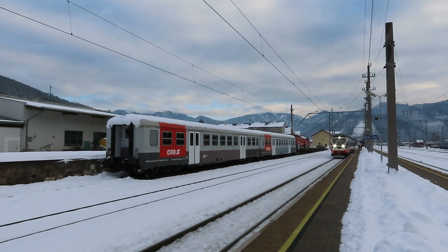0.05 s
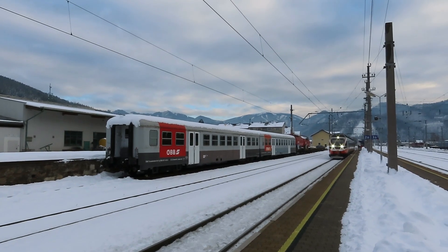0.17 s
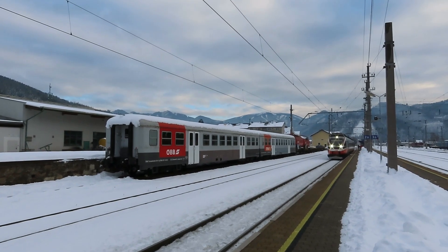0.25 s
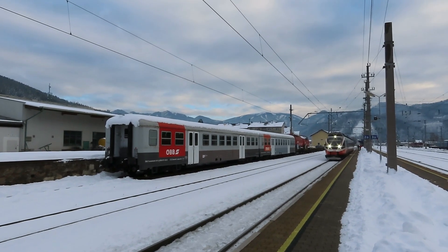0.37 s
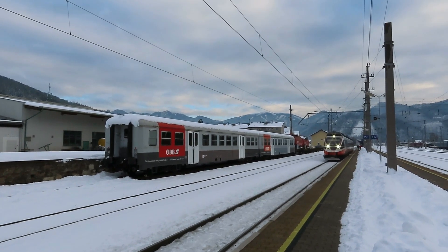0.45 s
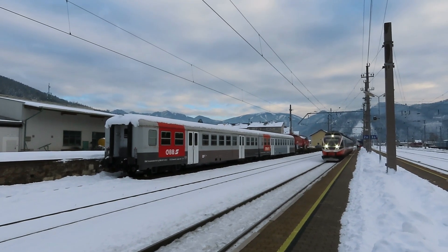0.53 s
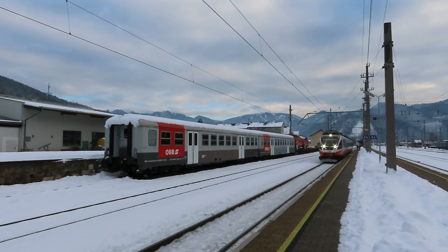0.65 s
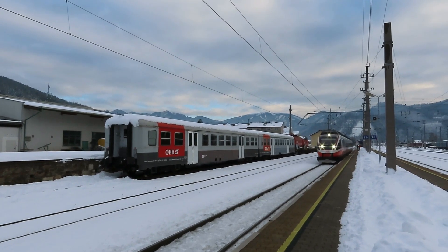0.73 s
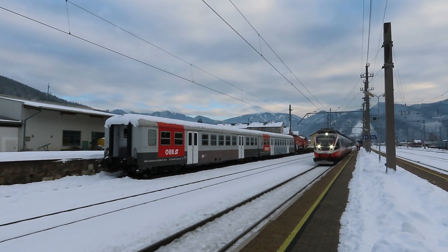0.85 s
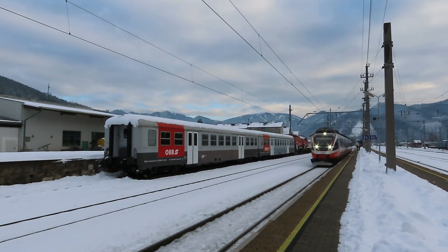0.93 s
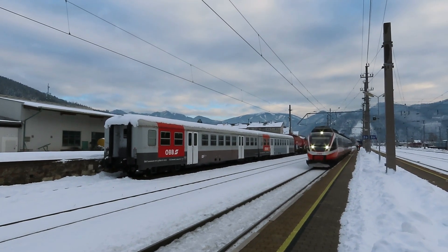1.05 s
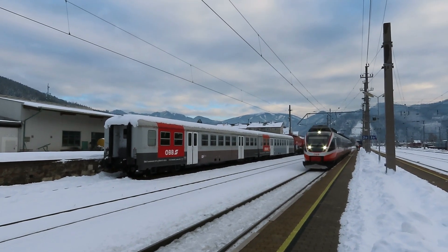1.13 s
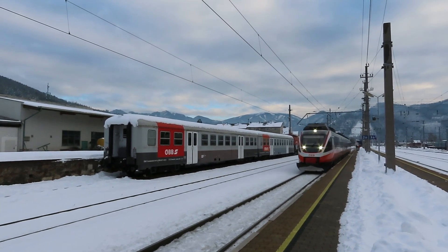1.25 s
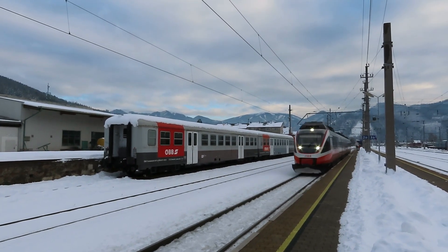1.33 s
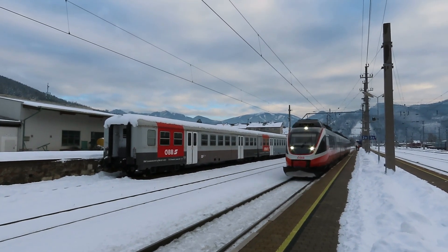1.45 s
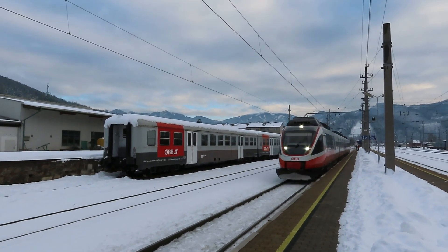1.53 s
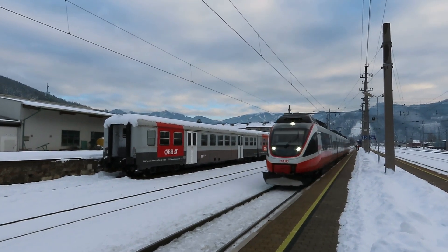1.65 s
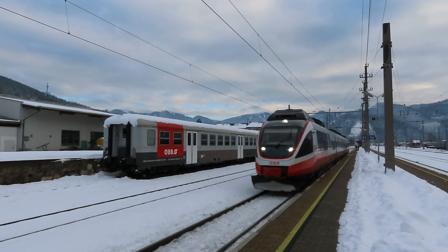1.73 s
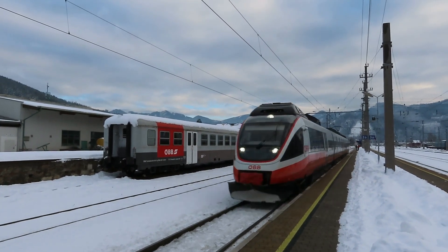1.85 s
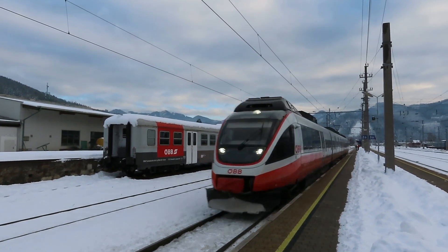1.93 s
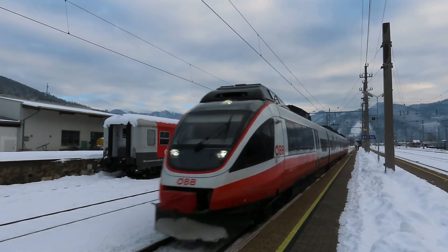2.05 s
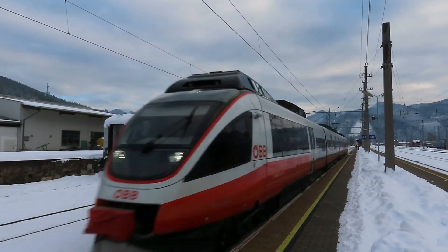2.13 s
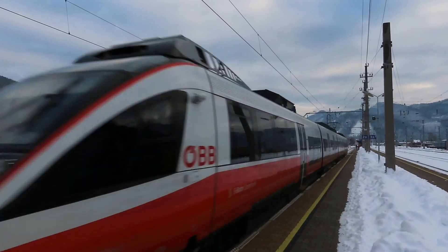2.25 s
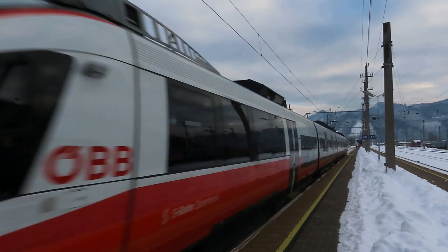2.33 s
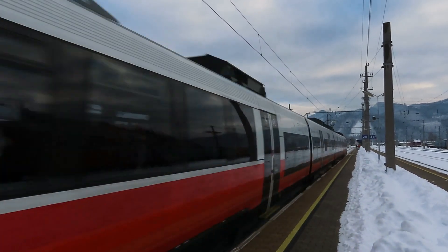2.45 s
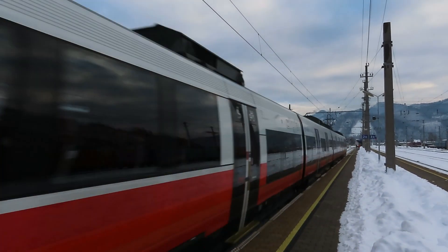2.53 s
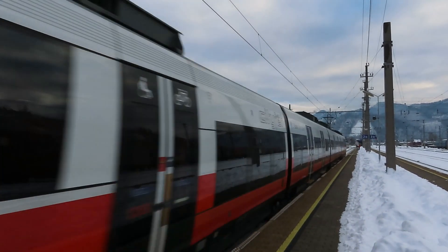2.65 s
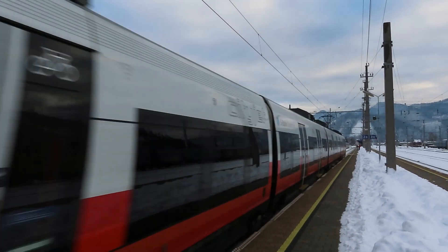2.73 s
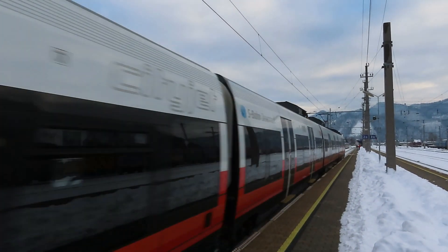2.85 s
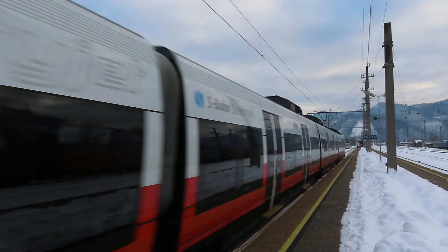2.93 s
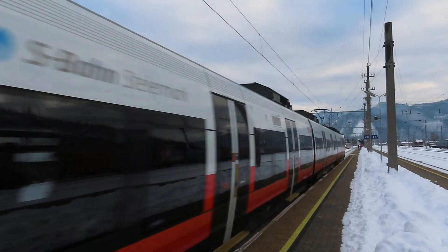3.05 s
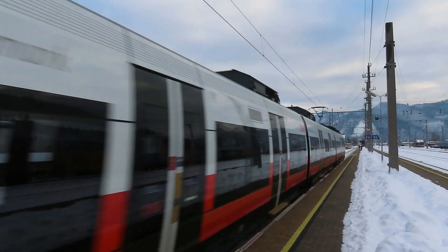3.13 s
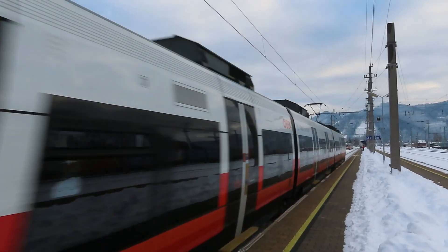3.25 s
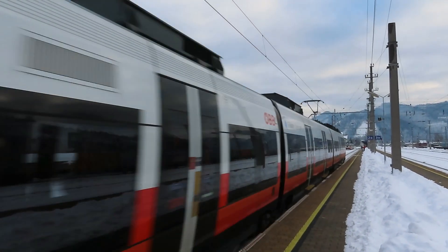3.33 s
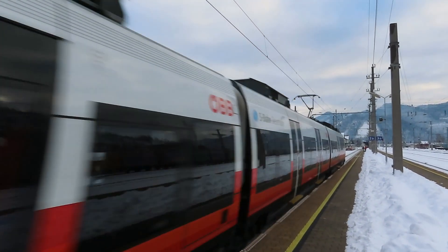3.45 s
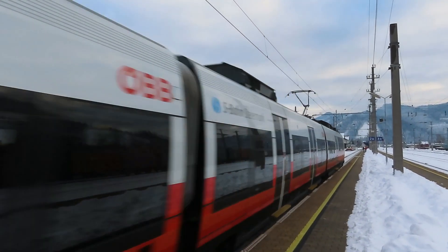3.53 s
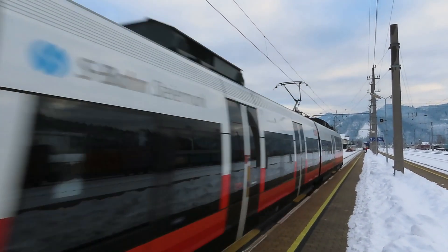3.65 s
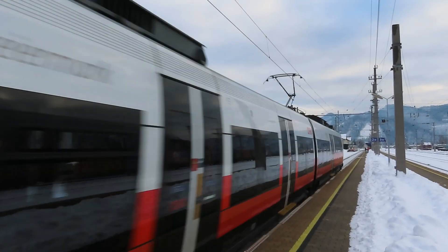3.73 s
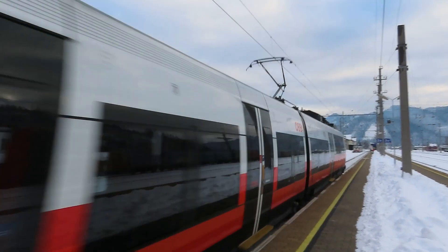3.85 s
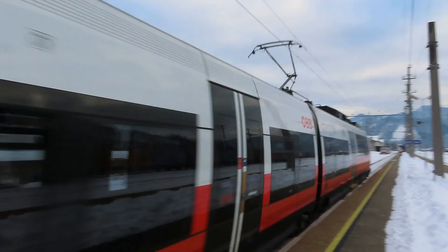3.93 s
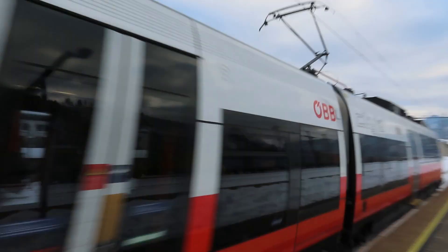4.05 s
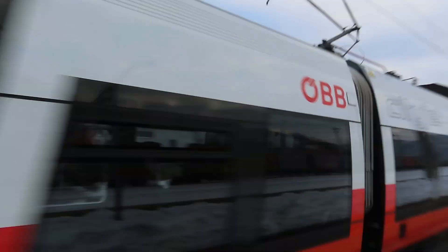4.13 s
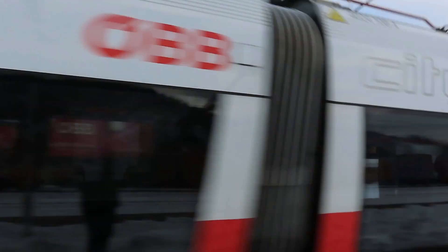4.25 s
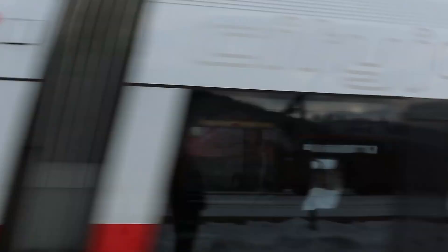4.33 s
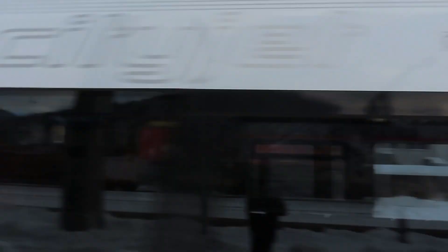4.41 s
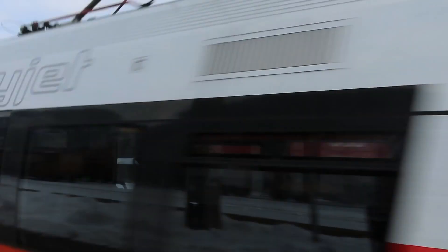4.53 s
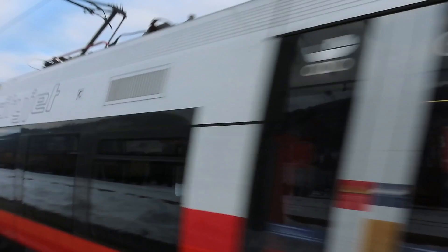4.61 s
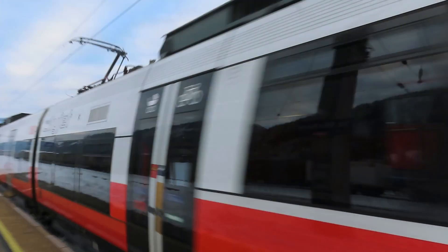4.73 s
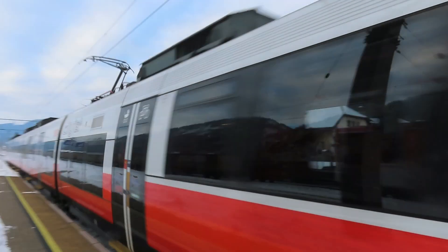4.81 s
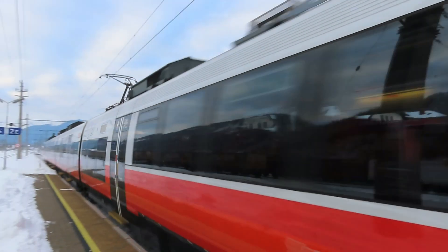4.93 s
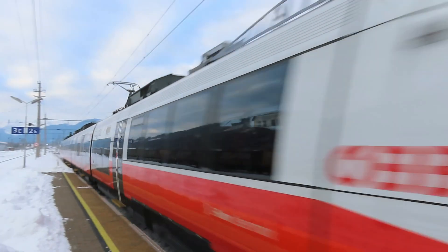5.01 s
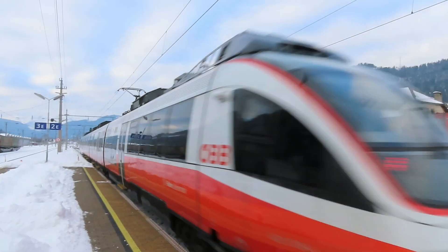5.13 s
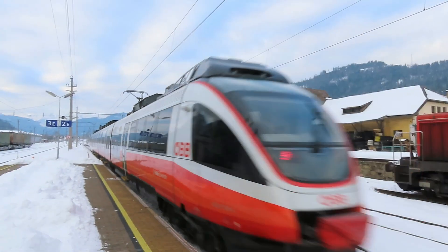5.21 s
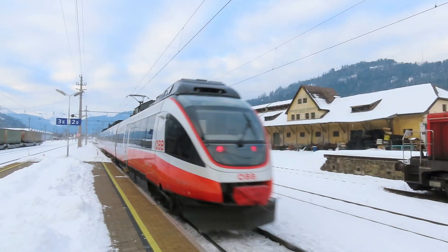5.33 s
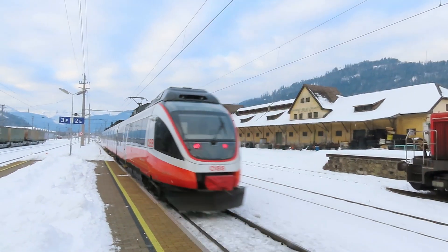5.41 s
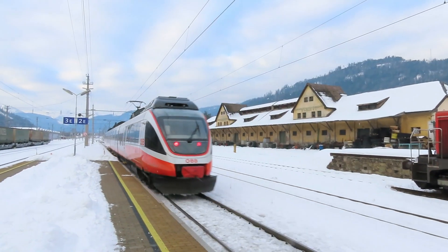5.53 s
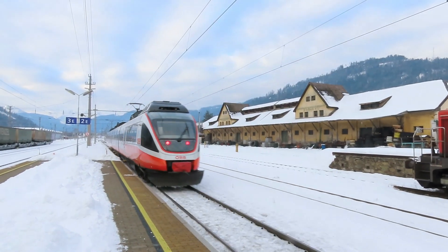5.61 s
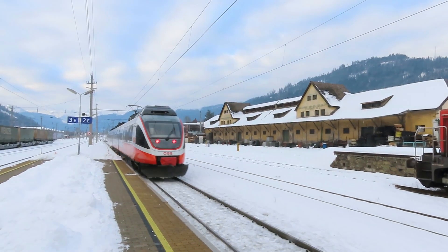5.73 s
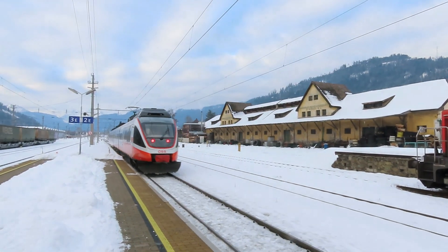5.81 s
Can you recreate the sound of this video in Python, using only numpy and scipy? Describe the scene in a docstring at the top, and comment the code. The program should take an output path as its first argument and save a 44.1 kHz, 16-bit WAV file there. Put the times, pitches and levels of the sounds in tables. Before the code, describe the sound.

On an open, snowy station platform, distant rail roar and ringing wheels swell with hissing snow and deep air rumble. The nose passes at about two and a half seconds with a buffeting gust and brief squeals. Carriages then boom low while wheel sets knock past in clusters, until the tail leaves and fans and a thin motor whine trail away. Close stereo microphone, nearly centred.

```python
"""Distant rail roar and ringing wheels come first, heard by two close microphone ports on a snowy platform.
An electric train nears at 24 m/s: filtered noise makes roar, snow hiss and air, tuned resonances the ringing.
The nose pushes a gust over the ports; then the platform edge hides the rails while bogies rumble and knock by.
Bogies are swells of coloured noise, knocks are sums of dying modes; a thin rising motor whine trails away."""
import sys
import numpy as np
from scipy import signal
from scipy.fft import rfft, irfft, next_fast_len
from scipy.io import wavfile
from scipy.ndimage import uniform_filter1d, minimum_filter1d, map_coordinates

SR = 44100
rng = np.random.default_rng(int(sys.argv[2]) if len(sys.argv) > 2 else 0)


def store_pcm(level_fs):
    """Save levels as 16-bit WAV."""
    pcm = np.round(np.clip(level_fs, -1, 1) * 32767).astype(np.int16)
    wavfile.write(sys.argv[1], SR, np.atleast_2d(pcm).T)


N = 258867
TIME = np.arange(N) / SR
# speed of the train, and the moments when its front wheels and its tail go by
SPEED_M_S, FRONT_S, TAIL_S = 24, 2.578, 5.005


def undb(db):
    """Decibels to gain."""
    return 10 ** (np.asarray(db) / 20)


def unit(x):
    """Scale to rms 1."""
    return x / np.sqrt(np.mean(x ** 2))


def curve(rows):
    """Each column of a table after its times, interpolated at every sample."""
    s, *columns = np.transpose(rows)
    return [np.interp(TIME, s, column) for column in columns]


def during(rows, fade_s=0.064):
    """1 within the time span of a table, fading out on both sides."""
    first_s, last_s = rows[0][0], rows[-1][0]
    return np.interp(TIME, [first_s - fade_s, first_s, last_s, last_s + fade_s], [0, 1, 1, 0])


def shape(x, points):
    """Filter by a spectrum of (Hz, dB) points, joined along log frequency."""
    hz, db = np.transpose(points)
    size = next_fast_len(N)
    bins = np.maximum(np.fft.rfftfreq(size, 1 / SR), 1)
    gain = undb(np.interp(np.log(bins), np.log(hz), db))
    return irfft(rfft(x, size) * gain, size)[..., :N]


def walk(rate):
    """Random levels held 1 / rate s and slewed twice; spread 1."""
    k = max(int(SR / rate), 1)
    held = rng.standard_normal(N)[np.arange(N) // k]
    return unit(uniform_filter1d(uniform_filter1d(held, k), k))


def delay(x, samples):
    """Read a sound late by a fixed or moving number of samples."""
    return map_coordinates(x, [np.arange(N) - samples], order=5, mode="mirror")


def resonance(hz, width_hz):
    """A randomly driven resonance: its strength and phase wander as fast as it is wide."""
    drive = walk(width_hz) + 1j * walk(width_hz)
    return np.real(drive * np.exp(2j * np.pi * np.cumsum(hz * np.ones(N)) / SR))


def spread(at_s, reach_m):
    """Gain 1 / distance of a part of the train that passes reach_m away; 1 as it passes."""
    return reach_m / np.hypot(reach_m, SPEED_M_S * (TIME - at_s))


def fade(seconds, db_per_s):
    """Gain 1 until the count of seconds turns positive, then a steady fall."""
    return undb(-db_per_s * np.maximum(seconds, 0))


def bell(at_s, half_s):
    """A smooth swell that reaches 1 at one moment."""
    return np.exp(-.5 * ((TIME - at_s) / half_s) ** 2)


def together(gains):
    """Unrelated sources add in power."""
    return np.sqrt(sum(gain ** 2 for gain in gains))


# scattered sound that differs between the two ports: [f/Hz, side minus mid level/dB before scatter_db]
SCATTER = [(40, -51), (150, -30.5), (400, -22), (700, -24.5), (1300, -17), (3000, -15), (6000, -9.5),
           (10000, -7.5), (15000, -10)]


def noise(colour, scatter_db=0):
    """Coloured noise at both ports, with a scattered part that differs between them."""
    mid, side = shape(rng.standard_normal((2, N)), colour)
    side = shape(unit(side), SCATTER) * undb(scatter_db)
    return unit(mid) + np.array([side, -side])


def roar_level(front_db=-24.5, front_reach_m=12, hide_db_per_s=50,
               surge_s=1.31, surge_half_s=0.083, surge_db=2, bogie_reach_m=6.76,
               tail_db=-43.0, tail_reach_m=4.2, emerge_db_per_s=45,
               shade_s=2.525, shade_half_s=0.081, shade_db=-4.0):
    """Relative roar: grows and surges, shaded by the nose, hidden by the platform, leaking at bogies and tail."""
    swell_db = surge_db * bell(surge_s, surge_half_s) + shade_db * bell(shade_s, shade_half_s)
    hidden = fade(TIME - FRONT_S, hide_db_per_s)
    front = undb(front_db + swell_db) * spread(FRONT_S, front_reach_m) * hidden
    leaks = [undb(roar_db) * spread(s - lead_s, bogie_reach_m) ** 3
             for s, _, _, _, roar_db, _, _, lead_s in BOGIES]
    tail = undb(tail_db) * spread(TAIL_S, tail_reach_m) * fade(TAIL_S - TIME, emerge_db_per_s)
    return together([front, tail, *leaks])


# share of the roar that the ground mirrors while the train is far and once it is here, and how late it comes
MIRROR_FAR, MIRROR_NEAR, MIRROR_DELAY_S = 0.3, 0.034, 0.00053
# spectrum of the rail roar: [f/Hz, relative level/dB per Hz]
ROAR_COLOUR = [(50, -31), (120, -12), (170, -11.5), (240, -3), (330, -0.5), (520, -2), (760, 0.5),
               (1100, -5), (1400, -6.5), (1800, -6), (2150, -16), (2700, -16), (3200, -24), (4200, -27),
               (6000, -37), (15000, -61.5)]


def rail_roar(gain_db=9, flutter_db=0.83, ground_turn_rad=0.71, closing_s=0.97):
    """Rough wheels shake the rails; a ground bounce combs roar and snow hiss, most while the train is far."""
    share = np.interp(TIME, [FRONT_S - closing_s, FRONT_S], [MIRROR_FAR, MIRROR_NEAR])
    roar = noise(ROAR_COLOUR) * roar_level() * undb(gain_db + flutter_db * walk(29.63))
    direct = roar + snow_hiss()
    # soft ground turns the phase of what it reflects
    analytic = signal.hilbert(direct, next_fast_len(N))[:, :N]
    mirrored = np.real(analytic * np.exp(1j * ground_turn_rad))
    bounce = np.array([delay(port, MIRROR_DELAY_S * SR) for port in mirrored])
    return (direct + share * bounce) / np.sqrt(1 + share ** 2)


# leading wheels: pitch as they pass before Doppler, its slow sag, the moment and distance of passing
RING_HZ, RING_SAG_HZ_PER_S, RING_PASS_S, RING_DISTANCE_M = 756, 19, 2.62, 2.195
# resonances of a wheel: [multiple of its ringing pitch, relative level/dB]
WHEEL_MODES = [(.95, -5.5), (1, 0), (1.035, -1.5), (1.07, -3.5), (2.13, -10.5)]


def wheel_ring(width_hz=28, gain_db=-23.5, reach_m=12, hide_db_per_s=90, start_s=0.39, rise_db_per_s=40):
    """The wheel's resonances, driven at random by the rail, grow as it nears and drop in pitch as it passes."""
    since_s = TIME - RING_PASS_S
    along_m = SPEED_M_S * since_s
    # Doppler shift, with sound at 343 m/s
    doppler = 1 / (1 + SPEED_M_S / 343 * along_m / np.hypot(along_m, RING_DISTANCE_M))
    hz = (RING_HZ - RING_SAG_HZ_PER_S * since_s) * doppler
    ring = sum(undb(mode_db) * resonance(hz * ratio, width_hz) for ratio, mode_db in WHEEL_MODES)
    rise, hidden = fade(start_s - TIME, rise_db_per_s), fade(since_s, hide_db_per_s)
    return unit(ring) * undb(gain_db) * spread(FRONT_S, reach_m) * rise * hidden


# thin sizzle of snow while the train is still far off: [f/Hz, relative level/dB per Hz]
FAR_SNOW_COLOUR = [(7000, -34.5), (10000, -18), (11000, -11), (12700, -2), (13800, -7), (15700, -5.5)]


def far_snow(level_db=-59, rise_db_per_s=5, shared_db=-14):
    """A very high sizzle runs ahead of the train, wide and nearly opposite at the two ports."""
    mid, side = unit(shape(rng.standard_normal((2, N)), FAR_SNOW_COLOUR))
    ports = mid * undb(shared_db) + np.array([side, -side])
    return ports * undb(level_db + rise_db_per_s * TIME) * fade(TIME - FRONT_S, 60)


# puffs of air from bow wave, nose, front wheels, carriage gaps and tail: [t/s, level/dB, half duration/s]
PUFFS = [(0.1, -45, .15), (0.6, -38.5, 0.3), (1.02, -33, 0.11), (1.288, -30.5, 0.1), (1.615, -27, 0.047),
         (1.834, -23.5, 0.067), (2.3, -21, 0.072), (2.563, -23.5, 0.03), (2.852, -36.5, 0.22),
         (5.324, -37.5, 0.12), (5.85, -43, 0.14)]


def air_level(bow_db=-23, bow_reach_m=18, falloff=1.65, stop_db_per_s=200, drag_db=-55):
    """A bow wave builds and stops once the front is past; single puffs ride on it and on a faint drag."""
    bow = undb(bow_db) * spread(FRONT_S, bow_reach_m) ** falloff * fade(TIME - FRONT_S, stop_db_per_s)
    puffs = [undb(db) * bell(s, half_s) for s, db, half_s in PUFFS]
    return together([bow, undb(drag_db), *puffs])


# spectrum of the moving air: [f/Hz, relative level/dB per Hz]
AIR_COLOUR = [(10, -17), (25, 1.5), (38, -3.5), (55, 8.5), (72, 4.5), (90, -2), (120, 1.5), (170, -7.5),
              (400, -52.5), (3000, -84.5)]


def air_rumble():
    """The deep sound of the air that the train pushes ahead and drags along."""
    return noise(AIR_COLOUR) * air_level()


# hiss of snow blown up by the nose: [t/s, level/dB before gain_db]
SNOW = [(0.98, -62.5), (1.14, -50.5), (1.35, -49.5), (1.87, -48.5), (2.31, -38.5), (2.51, -42.5),
        (2.57, -43.5), (2.79, -55), (3.14, -62.5), (3.3, -92.5)]
# its spectrum: [f/Hz, relative level/dB per Hz]
SNOW_COLOUR = [(1000, -19), (2500, 19), (3200, 2), (4200, 9), (5000, 2), (8000, 5), (11000, 2),
               (13800, 0.5), (15700, -9)]


def snow_hiss(gain_db=4.5, flutter_db=1.34):
    """Fine snow sprays ahead of the train until the nose has gone by."""
    db, = curve(SNOW)
    return noise(SNOW_COLOUR, scatter_db=0.5) * undb(db + gain_db + flutter_db * walk(60)) * during(SNOW)


# low booms of the air around the train: [t/s, level/dB, half duration/s, f/Hz]
BOOMS = [(1.493, -27.5, 0.032, 118), (1.7, -30.5, 0.061, 135), (1.94, -24.5, 0.053, 130),
         (2.17, -22.5, 0.072, 150), (3.102, -21, 0.046, 164), (5.048, -36.5, 0.11, 114.9),
         (5.254, -35, 0.053, 111.4)]


def air_booms(width_hz=55):
    """Air booms in short swells on low, wavering notes: ahead of the nose, under a carriage, behind the tail."""
    return sum(resonance(hz, width_hz) * undb(db) * bell(s, half_s) for s, db, half_s, hz in BOOMS)


def rumble_level(side_db=-22.5, start_s=1.73, end_s=4.725, rise_db_per_s=19, fall_db_per_s=55,
                 nose_s=2.29, nose_db=-14, nose_reach_m=2.6,
                 bogie_reach_m=5, lag_s=0.03, tail_db=-28.5, tail_reach_m=9):
    """The relative boom holds beside carriages, swells at nose and bogies, and trails behind the tail."""
    side = undb(side_db) * fade(start_s - TIME, rise_db_per_s) * fade(TIME - end_s, fall_db_per_s)
    nose = undb(nose_db) * spread(nose_s, nose_reach_m) ** 2
    tail = undb(tail_db) * spread(TAIL_S, tail_reach_m)
    swells = [undb(boom_db) * spread(s + lag_s, bogie_reach_m) ** 2
              for s, _, _, _, _, boom_db, _, _ in BOGIES]
    return together([side, nose, tail, *swells])


# spectrum of the carriage boom: [f/Hz, relative level/dB per Hz]
RUMBLE_COLOUR = [(20, -58.5), (45, -37.5), (80, -12), (130, -2), (175, -2), (220, 1.5), (340, 3),
                 (480, -1.5), (600, -5.5), (750, -11.5), (1000, -14), (1500, -26), (3000, -45),
                 (8000, -60.5), (15000, -81)]


def body_rumble(gain_db=-1.0, throb_db=1.14):
    """The carriages boom in the gap between train and platform."""
    level = rumble_level() * undb(gain_db + throb_db * walk(21.76))
    return noise(RUMBLE_COLOUR, scatter_db=-28.0) * level


# brief groans, squeals and squeaks of wheels rubbing the rail: [t/s, level/dB, half duration/s, f/Hz]
SQUEALS = [(2.06, -28.5, 0.04, 841), (2.265, -18, 0.019, 786), (2.286, -20, 0.036, 840),
           (2.416, -16, 0.0095, 856), (2.566, -20, 0.011, 760), (2.615, -17.5, 0.0085, 772),
           (3.136, -15, 0.026, 535), (3.191, -11.5, 0.017, 570), (3.22, -14.5, .012, 491),
           (3.783, -14, 0.018, 415), (3.85, -22.5, 0.027, 505), (3.907, -27, 0.0069, 826),
           (4.419, -20.5, .025, 364.7), (4.55, -24, 0.025, 357), (3.946, -57, 0.009, 3340),
           (4.19, -63, .02, 4300), (4.37, -58, .012, 3330), (4.92, -57, .06, 2530),
           (5.364, -36, 0.075, 312), (5.62, -59, .03, 2280)]


def wheel_squeals(waver=0.0029, rough_db=3.5):
    """A rubbing wheel sings or groans for an instant on one rough, unsteady note."""
    wavering_s = np.cumsum(1 + waver * walk(90)) / SR
    notes = sum(undb(db) * bell(s, half_s) * np.sin(2 * np.pi * hz * wavering_s)
                for s, db, half_s, hz in SQUEALS)
    return np.sqrt(2) * notes * undb(rough_db * walk(120))


# spectrum of the gust at the microphone: [f/Hz, relative level/dB per Hz]
GUST_COLOUR = [(20, -20), (60, -5.5), (130, 8.5), (220, 2.5), (420, -10.5), (1000, -41.5), (4000, -42),
               (15000, -86.5)]


def nose_gust(at_s=2.406, reach_m=2.55, gust_db=-14.0, buffet_db=4.0):
    """The pressure wave of the nose buffets each port with its own noise."""
    eddies = unit(shape(rng.standard_normal((2, N)), GUST_COLOUR))
    closeness = spread(at_s, reach_m) ** 4
    return eddies * undb(gust_db + buffet_db * walk(25.66)) * closeness


# leading wheels come level with the microphone, each with a bright rush: [t/s, level/dB, half duration/s]
WHEEL_RUSHES = [(2.501, -15.5, 0.011), (2.54, -18, 0.012), (2.608, -21, 0.014)]
# spectrum of that rush: [f/Hz, relative level/dB per Hz]
RUSH_COLOUR = [(150, -20), (480, 7), (800, 6), (1300, 6), (1900, -4), (2600, -20), (3400, -11), (5000, -24),
               (9000, -28), (15000, -45)]


def wheel_rushes():
    """The leading wheels flash by in the open before the platform edge hides them."""
    return noise(RUSH_COLOUR) * together([undb(db) * bell(s, half_s) for s, db, half_s in WHEEL_RUSHES])


# snow thrown against the platform by plough and front wheels: [t/s, level/dB, reach/m]
SPRAYS = [(2.535, -31, 2.7), (2.73, -42.5, .7), (2.814, -50, .8)]
# its spectrum: [f/Hz, relative level/dB per Hz]
SPRAY_COLOUR = [(1500, -23.5), (3500, 0), (6000, -0.5), (9000, 0.5), (12500, 6.5), (15000, -2.5),
                (15700, -4.5)]


def plough_spray(scatter_db=-18.0, falloff=2.8):
    """The plough throws a burst of snow against the platform as it goes by, and two small swishes follow."""
    level = together([undb(db) * spread(s, reach_m) ** falloff for s, db, reach_m in SPRAYS])
    return noise(SPRAY_COLOUR, scatter_db) * level


# turns of a wheel per second, and a moment when its rough spot meets the rail
WHEEL_TURNS_HZ, WHEEL_TURN_S = 11.27, 3.77
# bogies going by, also used for roar, boom and bearing: [t/s, level/dB, half duration/s, resonance f/Hz,
# rail roar level/dB and carriage boom level/dB before their layers' gains,
# lead of the left port/samples, lead of the rail roar/s]
BOGIES = [(2.537, -20, 0.15, 431, -39.5, -26.5, 1.98, .066),
          (3.163, -19, 0.13, 480, -35.5, -14, 2.1, 0.075),
          (3.827, -19, 0.11, 415, -43.5, -17.5, 2, -0.0015),
          (4.409, -20.5, 0.17, 402, -44.5, -18.5, 0.86, 0.013),
          (4.998, -35, 0.12, 465, -48, -43.5, -1.8, 0.057)]
# spectrum of a rolling bogie: [multiple of its resonance, relative level/dB per Hz]
BOGIE_COLOUR = [(.1, -60), (.25, -31), (.67, -7), (.87, 0.5), (1.13, 4.5), (1.4, -4), (2, -14.5), (10, -49),
                (30, -75)]


def bogie_passes(throb=0.3, shake_db=1.94):
    """Each bogie swells and fades with its own resonance, throbbing once a wheel turn."""
    out = 0
    for s, db, half_s, hz, *_ in BOGIES:
        colour = [(hz * ratio, point_db) for ratio, point_db in BOGIE_COLOUR]
        swell = undb(db) / (1 + ((TIME - s) / half_s) ** 4) ** .5
        out = out + noise(colour, scatter_db=-14.5) * swell
    turns = WHEEL_TURNS_HZ * (TIME - WHEEL_TURN_S)
    return out * (1 + throb * np.cos(2 * np.pi * turns)) * undb(shake_db * walk(90))


# wheels knocking on the rail:
# [t/s, peak level/dB, centre f/Hz of the modes that the blow favours, ring time as a share of the modes' t60]
KNOCKS = [(2.928, -9, 300, 1), (2.961, -10, 290, 1.4), (3.034, -6, 259, 1), (3.057, -1.5, 406, 1),
          (3.094, -7, 331, .4), (3.129, -12, 503, 0.92), (3.150, -7, 528, 0.79), (3.174, -3, 363, 0.84),
          (3.212, -3.5, 492, 1.5), (3.25, -10, 342, .5), (3.296, -8.5, 484, .8), (3.32, -7.5, 223, 0.77),
          (3.738, -12.5, 420, 1), (3.762, -2.5, 365, 1.3), (3.781, -2, 423, 0.74), (3.825, -4, 463, 0.65),
          (3.855, -8, 328, 0.76), (3.936, -5, 300, 0.81), (3.954, -7, 290, 0.99), (4.117, -12, 293, .8),
          (4.196, -3.5, 334, 1), (4.209, -5.5, 343, .9), (4.277, -5.5, 503, 0.68), (4.290, -6, 280, 0.95),
          (4.301, -4, 320, .6), (4.314, -9, 400, 0.52), (4.339, -12, 420, .5), (4.363, -10, 490, 0.78),
          (4.379, -6.5, 240, 0.71), (4.392, -5.5, 360, .9), (4.471, -3.5, 570, 0.54),
          (4.489, -6.5, 358, 0.45), (4.53, -9, 350, 1), (4.553, -7.5, 317, 0.83), (4.68, -12, 310, 1.3),
          (4.777, -13.5, 298, 1.6), (5.228, -18, 328, 0.82), (5.328, -24, 320, 1.2)]
# modes of a bogie: [f/Hz before detuning, relative level/dB, t60/s]
BOGIE_MODES = [(223.7, 0.5, 0.12), (288, 1.5, 0.06), (347, 2.5, 0.036), (427, 0, 0.046), (489, 1.5, 0.042),
               (572, 1, 0.063), (790, 1, 0.033), (1100, -3.5, 0.02), (1550, -3.5, 0.018)]


def wheel_knocks(contact_s=0.00451, detune=0.021, favour_octaves=0.23):
    """Each knock rings slightly detuned bogie modes, favouring those near its own centre frequency."""
    out, t = np.zeros(N + SR), np.arange(SR // 10) / SR
    hz, mode_db, t60 = np.transpose(BOGIE_MODES)[:, :, None]
    chances = rng.standard_normal((len(KNOCKS), len(hz), 1))
    for (s, db, centre_hz, ring), chance in zip(KNOCKS, chances):
        favour = 1 / (1 + (np.log2(hz / centre_hz) / favour_octaves) ** 2)
        decay = np.exp(-np.log(1000) * t / (ring * t60))
        tones = np.sin(2 * np.pi * hz * (1 + detune * chance) * (t - contact_s))
        modes = favour * undb(mode_db) * decay * tones
        # the contact softens the onset
        blow = modes.sum(0) * (1 - np.exp(-(t / contact_s) ** 2))
        start = int(s * SR)
        out[start:start + len(t)] += blow / np.abs(blow).max() * undb(db)
    return out[:N]


def knock_clatter(level_db=-23, centre_hz=1050, width_hz=900, decay_s=0.011):
    """Each knock also sets loose fittings clattering for an instant."""
    bursts = sum(undb(db) * (TIME > s) * np.exp(-np.abs(TIME - s) / decay_s) for s, db, *_ in KNOCKS)
    return resonance(centre_hz, width_hz) * bursts * undb(level_db)


# the pantograph sizzles on the frosty wire: [t/s, level/dB, half duration/s]
SIZZLES = [(3.825, -63, .018), (3.915, -67, .025), (4.307, -63, .026), (4.56, -70, .025)]


def wire_sizzle(centre_hz=7400, width_hz=3200, crackle_db=3):
    """The pantograph sizzles now and then on the frosty wire."""
    level = together([undb(db) * bell(s, half_s) for s, db, half_s in SIZZLES])
    return resonance(centre_hz, width_hz) * level * undb(crackle_db * walk(400))


# hiss of the pantograph on the overhead wire: [f/Hz, relative level/dB per Hz]
PANTOGRAPH_COLOUR = [(2500, -9), (4500, 7.5), (6000, -10), (8000, -10), (10500, -16.5), (15000, -28)]


def pantograph(at_s=4.53, reach_m=6, level_db=-59, chatter_db=2.5):
    """The pantograph scrapes along the overhead wire, chattering lightly as it passes."""
    return noise(PANTOGRAPH_COLOUR) * spread(at_s, reach_m) ** 2 * undb(level_db + chatter_db * walk(70))


# cooling fans at the rear: [t/s, level/dB]
FANS = [(4.85, -63), (5.1, -34), (5.35, -34), (5.6, -36), (5.87, -37)]
# their spectrum: [f/Hz, relative level/dB per Hz]
FAN_COLOUR = [(200, 3), (560, 20.5), (1000, 9.5), (1600, 7), (1950, -8), (2250, 3.5), (2550, -5),
              (2800, -12), (3150, -3.5), (3600, -7.5), (4000, -7.5), (5200, -20), (7500, -22.5),
              (11000, -31), (15000, -43)]


def cooling_fans():
    """Cooling fans at the rear whirr in a few broad resonances."""
    db, = curve(FANS)
    return noise(FAN_COLOUR) * undb(db) * during(FANS)


# last wheels coming out from behind the platform edge: [t/s, level/dB, half duration/s, f/Hz, width/Hz]
REAR_RINGS = [(5.17, -48, 0.096, 2480, 260), (5.12, -36.5, 0.061, 775, 63)]


def rear_wheel_ring():
    """The last wheels ring faintly, low and high, as they come out from behind the platform edge."""
    return sum(resonance(hz, width_hz) * bell(s, half_s) * undb(db)
               for s, db, half_s, hz, width_hz in REAR_RINGS)


# traction motor whine: [t/s, f/Hz before a slight waver, level/dB]
WHINE = [(5.3, 729.5, -54), (5.42, 745, -42), (5.6, 743, -35.5), (5.75, 759, -35), (5.87, 770, -37)]


def motor_whine(hum_hz=127, hum_width_hz=55, hum_db=-1):
    """The rear motors pull: a thin, rising, barely wavering tone over a low hum set relative to it."""
    hz, db = curve(WHINE)
    wavering_hz = hz * (1 + .002 * walk(40))
    tone = np.sin(2 * np.pi * np.cumsum(wavering_hz) / SR)
    hum = resonance(hum_hz, hum_width_hz) * undb(hum_db)
    return (unit(tone) + hum) * undb(db) * during(WHINE)


def bearing(rest_samples=0.13, lag_s=0.14, swing_s=0.17):
    """Lead of the left port in samples: each bogie drags the sound sideways just after it has passed."""
    return rest_samples + sum(lead * bell(s + lag_s, swing_s) for s, *_, lead, _ in BOGIES)


def scene(shade_db=0.57):
    """The train reaches the two close ports a moment apart; the body between them shades the far port's roar."""
    lead = bearing()
    # shade_db is per sample of lead
    roar = rail_roar() * undb(shade_db * np.array([lead, -lead]))
    wheels = roar + wheel_ring() + wheel_squeals() + wheel_rushes() + rear_wheel_ring()
    bogies = bogie_passes() + wheel_knocks() + knock_clatter()
    air = air_rumble() + air_booms() + plough_spray()
    train = body_rumble() + wire_sizzle() + pantograph() + cooling_fans() + motor_whine()
    left, right = wheels + bogies + air + train
    ports = np.array([delay(left, -lead / 2), delay(right, lead / 2)])
    return ports + far_snow() + nose_gust()


TOP_HZ = 15730  # upper limit of the microphone chain
# hiss of the microphone: [f/Hz, relative level/dB per Hz]
MIC_HISS_COLOUR = [(2000, -15.5), (9000, -11.5), (11000, -13), (12600, -7.5), (14000, -10), (15700, -28)]


def record(dry, hiss_db=-82, side_hiss_db=-75):
    """The microphone chain adds a faint wide hiss, ducks peaks above full scale and cuts the top."""
    mid, side = unit(shape(rng.standard_normal((2, N)), MIC_HISS_COLOUR))
    wet = dry + mid * undb(hiss_db) + np.array([side, -side]) * undb(side_hiss_db)
    headroom = 1 / np.maximum(np.abs(wet).max(0), 1)
    # hold each dip in gain, then smooth it
    gain = uniform_filter1d(minimum_filter1d(headroom, size=301), size=301)
    top_cut = signal.ellip(12, .1, 90, TOP_HZ, fs=SR, output="sos")
    return signal.sosfilt(top_cut, wet * gain)


dry = scene()
out = record(dry)
store_pcm(out)
```